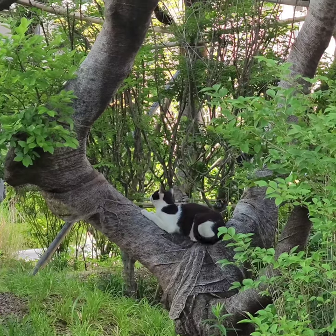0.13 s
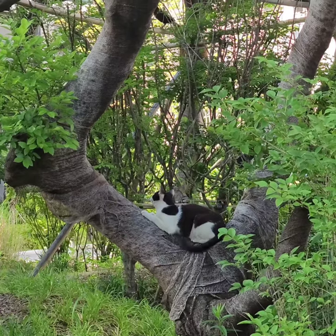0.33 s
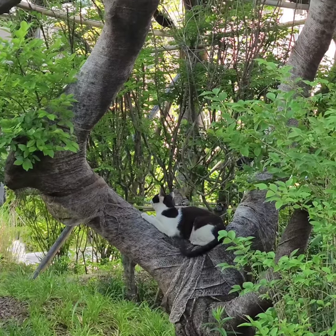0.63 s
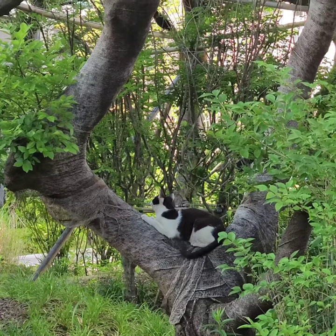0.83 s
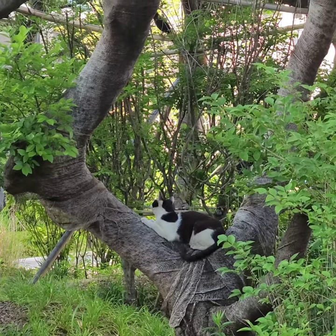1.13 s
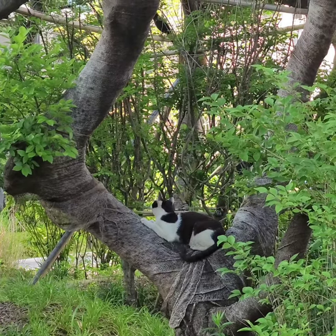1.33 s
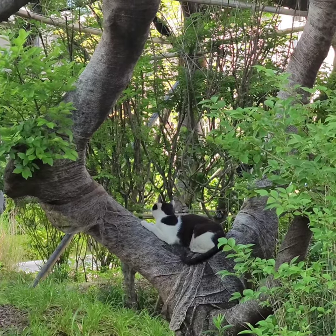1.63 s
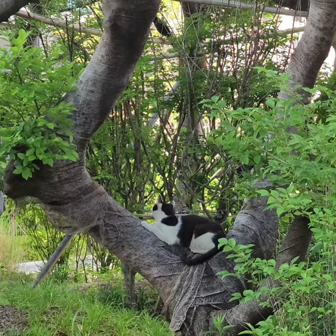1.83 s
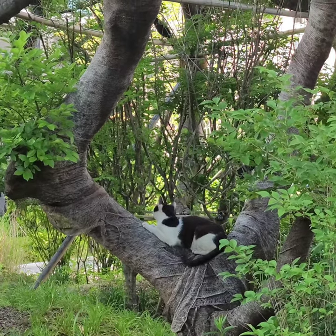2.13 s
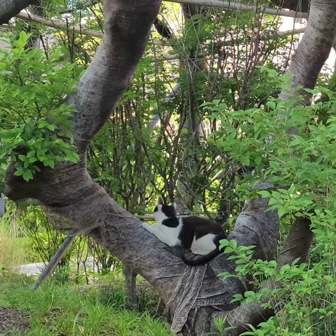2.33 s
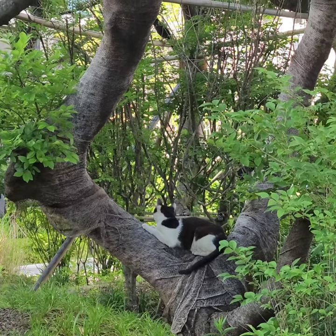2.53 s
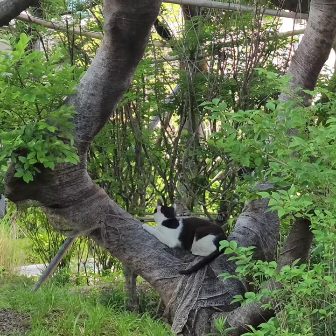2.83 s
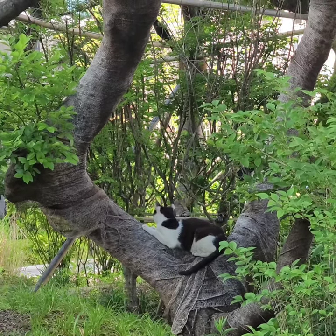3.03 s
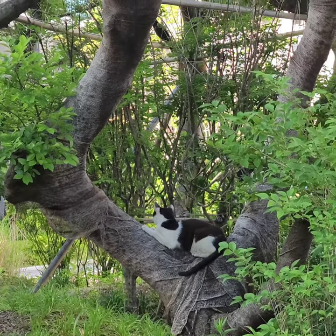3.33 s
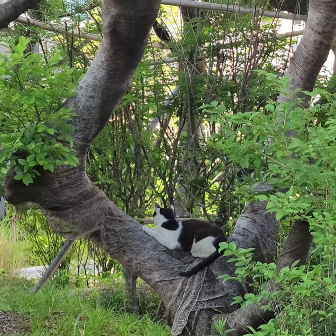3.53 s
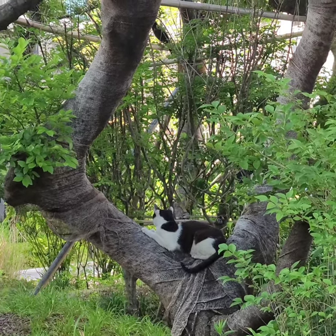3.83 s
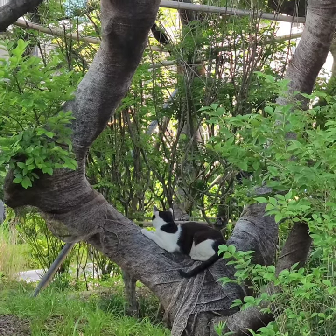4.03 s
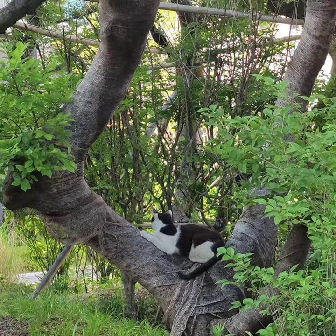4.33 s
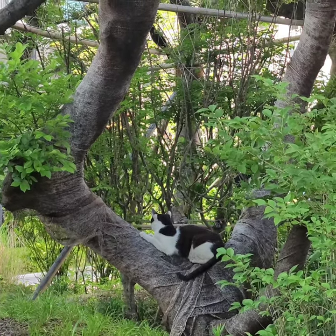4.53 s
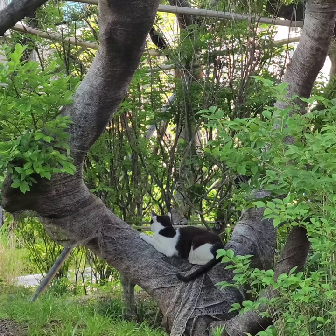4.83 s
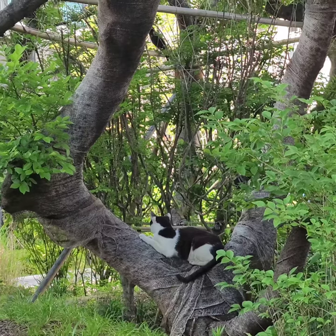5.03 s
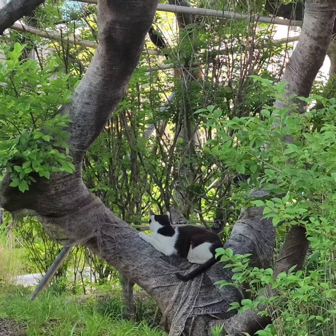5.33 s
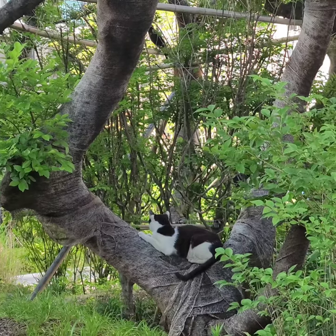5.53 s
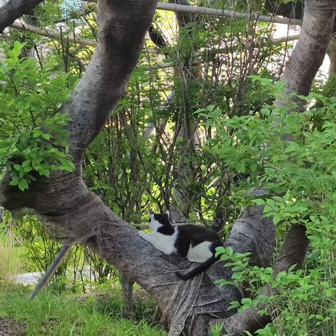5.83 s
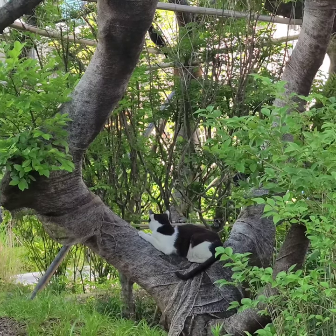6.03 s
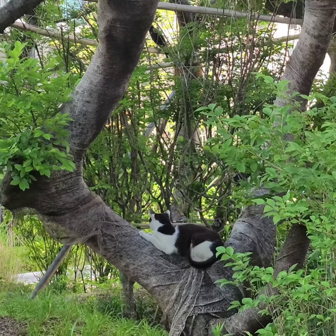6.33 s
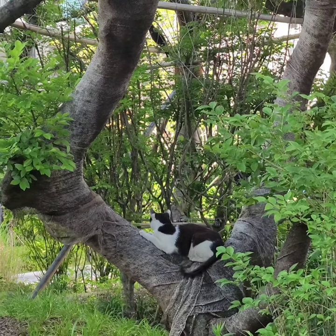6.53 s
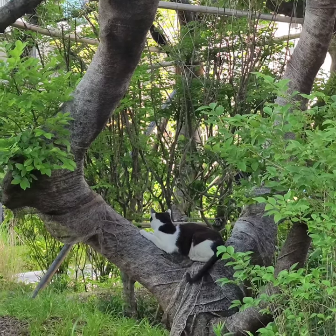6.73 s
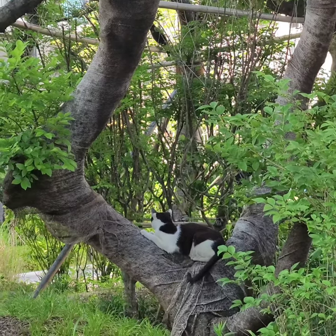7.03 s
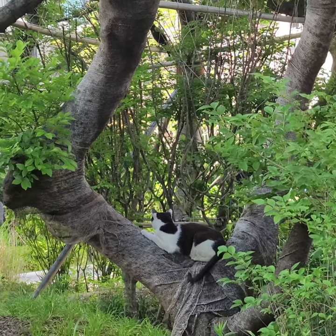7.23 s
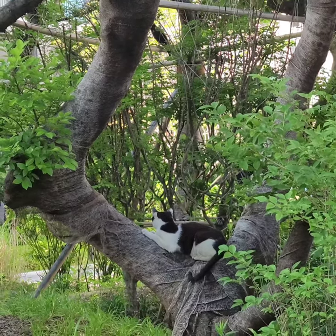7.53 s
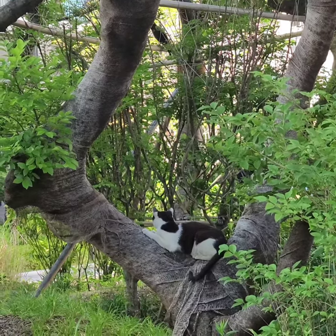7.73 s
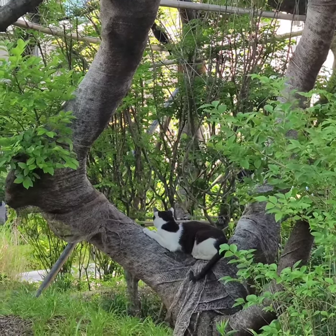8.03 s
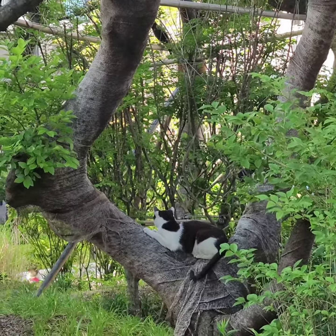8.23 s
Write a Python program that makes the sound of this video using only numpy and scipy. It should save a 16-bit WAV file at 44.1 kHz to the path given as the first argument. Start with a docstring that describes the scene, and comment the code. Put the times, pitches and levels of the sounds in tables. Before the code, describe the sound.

Outdoors among trees, a soft airy hush is joined by handling thuds at the left and thin bird squeaks. A crow gives two short, rough caws about half a second apart, answered by a cluster of husky chirps and pips. Things calm to faint whistles and lightly stirring leaves, then squeaks return near the end. After the caws the stereo hush becomes mono and thin, regaining bass only at the close.

```python
"""A distant hush fills a leafy garden; three soft bumps come on the left and a crow gives two rasping caws.
High arched squeaks, husky chirps, faint whistles and pips sound in the trees, and leaves stir.
The crow is a pulse source ringing in throat resonances; the small birds are tones swept and shaken in pitch.
Hush, rumble and leaves are coloured noise, the bumps are damped sines, and scatter follows each bird call.
For about five seconds the sound turns mono and loses its bass."""
import sys
import numpy as np
from scipy import signal
from scipy.fft import rfft, irfft
from scipy.io import wavfile
from scipy.ndimage import uniform_filter1d

SR = 44100
rng = np.random.default_rng(int(sys.argv[2]) if len(sys.argv) > 2 else 0)


def transcribe(signal):
    """Save signal, clipped to [-1, 1], as a 16-bit WAV file at the path in sys.argv[1]."""
    frames = np.atleast_2d(signal).T
    limited = np.clip(frames, -1, 1)
    pcm = np.round(limited * 32767).astype(np.int16)
    wavfile.write(sys.argv[1], SR, pcm)


N = 369558  # samples
T = np.arange(N) / SR  # seconds


def from_db(db):
    """Decibels are logarithmic: 20 dB is a factor of ten in amplitude."""
    return 10 ** (np.asarray(db) / 20)


def rms_one(x):
    """Normalisation to unit root-mean-square amplitude."""
    return x / np.sqrt(np.mean(x ** 2) + 1e-20)


def ramp(t, length_s):
    """Linear onset: climbs from 0 to 1 over the given length, starting at t = 0."""
    return np.clip(t / length_s, 0, 1)


def bell(t, width_s):
    """Gaussian swell of height 1 around t = 0."""
    return np.exp(-(t / width_s) ** 2)


def phase_of(hz):
    """Phase is the running integral of frequency."""
    return 2 * np.pi * np.cumsum(hz) / SR


def at_hz(points, hz):
    """Spectral interpolation on a log-frequency axis."""
    f, value = np.transpose(points)
    return np.interp(np.log(hz + 1e-3), np.log(f), value)


def butter(x, hz, kind, order=2):
    """Butterworth filtering: a maximally flat passband."""
    return signal.sosfilt(signal.butter(order, hz, kind, fs=SR, output="sos"), x)


def wobble(rate_hz, size):
    """Low-passed noise: a smooth random modulation of unit RMS."""
    noise = rng.standard_normal(size + SR // 4)
    return rms_one(butter(noise, rate_hz, "low")[-size:])  # the filter has settled by then


def resonate(x, hz, width_hz):
    """Resonance by frequency shifting and one-pole smoothing: peak gain 1, the centre may move."""
    r = np.exp(-np.pi * width_hz / SR)
    turn = np.exp(1j * phase_of(hz * np.ones(len(x))))
    return 2 * np.real(turn * signal.lfilter([1 - r], [1, -r], x / turn))


def add(out, start_s, sound):
    """Superposition: mixes a sound in at its time."""
    at = int(start_s * SR)
    out[at:at + len(sound)] += sound[:N - at]


# The crow's caws. Each row: start in seconds, time of highest pitch in s, time of greatest loudness in s,
# end in s, attack in s, release in s, top pitch in Hz, level of the throat sound in dB,
# rasp rate at top pitch in Hz, rasp depth 0-1, pitch drop in each rasp as a share, roughness 0-1,
# upper rasp in dB re throat sound, low harmonics at mid-caw in dB re throat sound,
# low, middle and high throat resonances at full effort in Hz.
CAWS = [(2.101, 2.165, 2.172, 2.347, .002, .022, 318, -22.8, 52, .3, .1, .54, -20, -16.5, 1340, 1610, 1820),
        (2.642, 2.70, 2.73, 2.878, .04, .003, 352, -20.2, 56, .45, .16, .44, -16, -15.5, 1200, 1425, 1680)]
# Throat resonances, low to high. Each row: width in Hz, gain in the first caw in dB, in the second caw in dB.
THROAT = [(260, 2, -3.5), (260, 2.5, 0), (240, 1.5, -7)]
THROAT_BAND_HZ = (1060, 1960)  # the band in which the throat radiates
# A caw's pitch lifts a little and then sags; its level swells and fades.
CAW_RISE_HZ_PER_S, CAW_SAG_HZ_PER_S, CAW_SWELL_DB_PER_S, CAW_FADE_DB_PER_S = 250, 510, 40, 45
# The beak opens with effort and lifts the throat resonances.
THROAT_LIFT_PER_DB = .004  # share of their pitch
# A soft croak leads into each caw: its length, and its level re full voice.
CROAK_S, CROAK_DB = .05, -7


def crow(jitter=0.057, noise_share=.45, upper_hz=3200, low_waver=0.96, low_tilt=0.35,
         low_growth_db_per_s=12, air_db=-40):
    """Source-filter principle: uneven syrinx pulses, chopped and swayed by a rasp, ring in the throat."""
    out = np.zeros(N)
    for k, row in enumerate(CAWS):
        start, highest, loudest, end, attack, release, top_hz, top_db = row[:8]
        rasp_hz, depth, drop, rough, upper_db, low_db, *throat_hz = row[8:]
        t = np.arange(start - CROAK_S, end, 1 / SR)
        pitch = top_hz - np.maximum(CAW_RISE_HZ_PER_S * (highest - t), CAW_SAG_HZ_PER_S * (t - highest))
        croak_db = CROAK_DB * (1 - ramp(t - start, attack))
        effort_db = croak_db - np.maximum(CAW_SWELL_DB_PER_S * (loudest - t),
                                          CAW_FADE_DB_PER_S * (t - loudest))
        envelope = from_db(top_db + effort_db) * ramp(t - t[0], 2 * attack) * ramp(end - t, release)

        # The rasp rate follows the pitch, and the pitch drops within each rasp burst.
        rasp = phase_of(rasp_hz * pitch / top_hz * (1 + .055 * rough * wobble(30, len(t))))
        rasp = rasp - np.interp(highest, t, rasp)
        burst_place = (rasp / (2 * np.pi) + .25) % 1
        sway = phase_of(pitch * drop * (.5 - burst_place))
        phase = phase_of(pitch)
        shaken = phase + 2 * np.pi * jitter * rough * wobble(150, len(t)) + sway

        # One pulse per cycle, with hiss that opens and closes along with it.
        pulses = rms_one(np.maximum(np.diff(np.floor(shaken / (2 * np.pi)), prepend=0), 0))
        hiss = rng.standard_normal(len(t)) * (1 + np.cos(shaken)) / 2
        source = pulses - pulses.mean() + noise_share * rough * rms_one(hiss)

        voice = np.zeros(len(t))
        lift = 1 + THROAT_LIFT_PER_DB * effort_db
        for n, (width, *gains) in enumerate(THROAT):
            # Neighbouring resonances have opposite signs.
            voice += (-1) ** n * from_db(gains[k]) * resonate(source, throat_hz[n] * lift, width)
        voice = rms_one(butter(voice, THROAT_BAND_HZ, "band", order=6))
        # The bird holds its effort steady while the cycles vary.
        voice = voice / np.sqrt(uniform_filter1d(voice ** 2, size=600) + 1e-3)
        upper = rms_one(resonate(resonate(source, upper_hz, 2400), upper_hz, 2400))

        # The first three harmonics waver slightly less and gain weight through the caw.
        low_phase = phase + low_waver * (shaken - phase)
        low = rms_one(sum(n ** low_tilt * np.sin(n * low_phase) for n in range(1, 4)))
        low_gain = from_db(low_db + low_growth_db_per_s * (t - t.mean()))
        caw = voice + from_db(upper_db) * upper + low_gain * low + from_db(air_db) * source
        add(out, t[0], envelope * rms_one(1 + depth * np.cos(rasp)) * caw)
    return out


# High stepped squeaks. Each row: start in seconds, accent in s, high note in s, low note in s, fall in s,
# end in s, top pitch before the sag in Hz, low note in Hz, middle of the fall in Hz,
# accent in dB, high note in dB, low note in dB, fall in dB, swell of the high note in dB,
# warble of the high note as a share of pitch.
SQUEAKS = [(1.157, 1.170, 1.184, 1.224, 1.261, 1.272, 8450, 6600, 5200, -18, -16.5, -25, -29, -8, .015),
           (1.324, 1.339, 1.345, 1.405, 1.421, 1.432, 8450, 6350, 5200, -22.5, -29.5, -21.5, -30, 0, .05),
           (2.569, 2.580, 2.586, 2.621, 2.633, 2.648, 7600, 6400, 5700, -34, -23.5, -22, -29, 0, .024),
           (2.708, 2.730, 2.735, 2.768, 2.782, 2.797, 8020, 6100, 4750, -20.5, -27.5, -36, -35, -5, .014),
           (7.207, 7.224, 7.232, 7.277, 7.296, 7.318, 8620, 6700, 5450, -16.5, -23, -26.5, -28.5, -1, .04),
           (7.401, 7.414, 7.420, 7.468, 7.483, 7.510, 8500, 6450, 5800, -29, -29.5, -29, -26, 0, .056)]
# The high note swoops up from below and sags; a faint tone and an accent sound on the way up.
SWOOP_FROM_HZ, SWOOP_S, SQUEAK_SAG_HZ_PER_S = 5000, 0.0087, 5000
SWOOP_DB, ACCENT_WIDTH_S = -37.5, 0.0036
# The voice breaks to the low note, which falls away at the end.
BREAK_S, FALL_HZ_PER_S = 0.00397, 32000


def squeaks(warble_hz=290, unevenness=.35, flutter_db=3.0, attack_s=.005, warble_grow_s=0.028,
            low_warble=0.037, fall_warble=0.073):
    """Frequency modulation: a tone swoops to a high note, breaks to a low one and falls, warbling unevenly."""
    out = np.zeros(N)
    for row in SQUEAKS:
        start, accent_s, high_s, break_s, fall_s, end, top_hz, low_hz, fall_hz = row[:9]
        accent_db, high_db, low_db, fall_db, swell_db, warble = row[9:]
        t = np.arange(start, end, 1 / SR)
        # Three overlapping shares: high note, low note and fall.
        high = ramp(break_s - t, BREAK_S)
        fall = ramp(t - fall_s + BREAK_S, BREAK_S)
        low = (1 - high) * (1 - fall)

        swoop_hz = (top_hz - SWOOP_FROM_HZ) * np.exp((start - t) / SWOOP_S)
        high_hz = top_hz - swoop_hz - SQUEAK_SAG_HZ_PER_S * (t - start)
        falling_hz = fall_hz - FALL_HZ_PER_S * (t - (fall_s + end) / 2)
        pitch = high * high_hz + low * low_hz + fall * falling_hz

        held = from_db(high_db + swell_db * ramp(t - high_s, break_s - high_s)) * ramp(t - high_s, attack_s)
        high_gain = from_db(SWOOP_DB) + held + from_db(accent_db) * bell(t - accent_s, ACCENT_WIDTH_S)
        gain = high * high_gain + low * from_db(low_db) + fall * from_db(fall_db)

        spread = high * warble * ramp(t - start, warble_grow_s) + low * low_warble + fall * fall_warble
        shake = np.sqrt(2) * np.sin(phase_of(warble_hz * (1 + unevenness * wobble(199, len(t)))))
        tone = np.sin(phase_of(pitch * (1 + spread * shake)))
        flutter = from_db(flutter_db * wobble(180, len(t)))
        add(out, start, tone * gain * flutter * signal.windows.tukey(len(t), .06))
    return out


# Husky chirps. Each row: start in seconds, length in s, top pitch in Hz, level in dB before chirp_db is added,
# swell over its length in dB, tremor as a share of pitch, regularity of the tremor 0-1,
# upper tone in Hz, upper tone in dB re lower tone.
CHIRPS = [(1.522, 0.11, 4130, -36, 0, 0.088, 0.7, 5670, -12),
          (1.699, 0.066, 4270, -35.5, 4, .07, 0.65, 6200, -20),
          (2.868, 0.065, 3980, -37, 2.5, .07, .7, 7600, -12),
          (2.938, .05, 4500, -34.5, 5, 0.14, 0.7, 5500, -9),
          (3.059, 0.071, 4070, -35.5, 2.5, 0.062, .65, 5670, -19.5),
          (3.115, 0.058, 4140, -31.5, 1, 0.072, 0.75, 5800, -15),
          (3.161, .06, 4450, -31, -1, 0.059, .7, 5800, -17),
          (3.287, 0.05, 4220, -30.5, 3, 0.057, 0.82, 7500, -12),
          (3.314, .085, 4655, -27.5, 0, 0.073, 0.88, 8070, -8),
          (3.373, 0.059, 4920, -27, 8, .03, 0.9, 7060, -11.5),
          (3.556, .055, 4410, -33, 4, 0.074, 0.8, 7000, -19),
          (3.604, .075, 4630, -29, -9, .066, 0.89, 7000, -22),
          (7.581, .05, 3900, -39, 2.5, .04, .6, 8240, -4),
          (7.629, .065, 4220, -37, 2.5, .11, 0.7, 8240, -6)]
# A chirp slides up to its top pitch: start as a share of the top, slide time, share of its length spent fading.
CHIRP_FROM, CHIRP_SLIDE_S, CHIRP_TAPER = .95, 0.0183, 0.24


def chirps(tremor_hz=305, unevenness=0.2, upper_tremor=.009, hiss_hz=6500, hiss_width_hz=1700, hiss_db=-3,
           throb_hz=45):
    """Two-voice syrinx: fast FM makes one tone husky; the other side adds a steadier one and throbbing hiss."""
    out = np.zeros(N)
    for start, length, top_hz, level_db, swell_db, tremor, steady_share, upper_hz, upper_db in CHIRPS:
        size = int(length * SR)
        ratio = CHIRP_FROM + (1 - CHIRP_FROM) * ramp(np.arange(size) / SR, CHIRP_SLIDE_S)
        shape_db = swell_db * np.linspace(-.5, .5, size)
        beat_hz = tremor_hz * (1 + unevenness * (1 - steady_share) * wobble(56, size))
        beat = np.sqrt(2) * np.sin(phase_of(beat_hz))
        shake = steady_share * beat + (1 - steady_share) * wobble(tremor_hz, size)
        lower = np.sin(phase_of(top_hz * ratio * (1 + tremor * shake)))

        upper = np.sin(phase_of(upper_hz * ratio * (1 + upper_tremor * wobble(tremor_hz, size))))
        hiss = resonate(rng.standard_normal(size), hiss_hz, hiss_width_hz)
        hiss = rms_one(resonate(hiss, hiss_hz, hiss_width_hz))
        throb = (1 + np.cos(phase_of(throb_hz * ratio))) / 2
        upper = upper + from_db(hiss_db) * hiss * throb
        envelope = from_db(level_db + shape_db) * signal.windows.tukey(size, CHIRP_TAPER)
        add(out, start, (lower + from_db(upper_db) * upper) * envelope)
    return out


# Thin whistles. Each row: start in seconds, length in s, note name, level in dB before far_db is added.
WHISTLES = [(.82, 0.15, "low", -42), (1.26, 0.096, "middle", -36.5), (1.343, 0.083, "middle", -45),
            (1.44, .13, "low", -44.5), (1.77, 0.051, "middle", -36.5), (1.94, .1, "low", -45),
            (1.98, .08, "high", -46), (3.95, 0.11, "low", -44), (4.15, .1, "low", -42),
            (4.66, 0.06, "middle", -39), (4.82, 0.12, "low", -43), (5.31, .08, "middle", -46.5),
            (5.86, .08, "low", -44), (6.36, 0.23, "high", -42)]
# Pitch of each named note in Hz.
WHISTLE_HZ = {"low": 2520, "middle": 3310, "high": 8200}
# Waver of each named note as a share of its pitch.
WHISTLE_WAVER = {"low": 0.0076, "middle": 0.0018, "high": 0.0206}
# Short rising pips. Each row: middle in seconds, level in dB before far_db is added.
PIPS = [(2.52, -42), (2.85, -33), (3.047, -33), (3.213, -37), (3.418, -31.5), (3.896, -32.5), (4.24, -36),
        (7.175, -31), (7.297, -31), (7.462, -33.5), (7.641, -30), (7.791, -33), (7.995, -33.5)]
PIP_HZ, PIP_SCATTER = 2114, 0.0196  # mean pitch, and its spread between pips as a share


def far_birds(pip_s=.022, pip_rise=0.21, pip_rough=0.044):
    """Sinusoidal tones: level whistles waver slowly in pitch; very short pips glide roughly upward."""
    out = np.zeros(N)
    for start, length, note, level_db in WHISTLES:
        size = int(length * SR)
        hz = WHISTLE_HZ[note] * (1 + WHISTLE_WAVER[note] * wobble(61, size))
        envelope = from_db(level_db) * signal.windows.tukey(size, .5)
        add(out, start, envelope * np.sin(phase_of(hz)))
    glide = np.linspace(-.5, .5, int(pip_s * SR))
    for s, level_db in PIPS:
        hz = PIP_HZ * (1 + PIP_SCATTER * rng.standard_normal() + pip_rough * wobble(400, len(glide)))
        tone = np.sin(phase_of(hz * (1 + pip_rise * glide)))
        add(out, s - pip_s / 2, from_db(level_db) * np.hanning(len(glide)) * tone)
    return out


# Bumps on the microphone. Each row: start in seconds, pitch in Hz,
# height in dB before rise, decay and channel gain, 60 dB decay time in s.
BUMPS = [(0.608, 128, -5.5, 0.0403), (.618, 48, -13.5, 0.11), (0.707, 108, -10, 0.061),
         (0.721, 50.2, -16.5, 0.14), (0.904, 86.5, -8, 0.047)]


def bumps(rise_s=0.004, left_db=3, right_db=-22):
    """Damped oscillation: soft thuds die away exponentially, almost only on the left."""
    out = np.zeros(N)
    t = np.arange(SR // 4) / SR
    for s, hz, height_db, t60 in BUMPS:
        envelope = from_db(height_db - 60 * t / t60) * (1 - np.exp(-t / rise_s))
        add(out, s, envelope * np.sin(2 * np.pi * hz * t))
    return out * from_db([[left_db], [right_db]])


def wall_echo(x, delay_s=.0222, echo_db=-9):
    """Specular reflection: a nearby wall returns one delayed, weaker copy."""
    return x + from_db(echo_db) * np.interp(T - delay_s, T, x, left=0)


def garden(x, wet_db, t60, width, first_s):
    """Diffuse scattering: trunks, leaves and walls return dense echoes that decay exponentially."""
    t = np.arange(int(.7 * SR)) / SR
    mid, side = rng.standard_normal((2, len(t))) * from_db(-60 * t / t60) * (t > first_s)
    scatter = (mid + width * side * [[1], [-1]]) / np.sqrt(np.sum(mid ** 2))
    return x + from_db(wet_db) * signal.fftconvolve(x[None], scatter, axes=1)[:, :N]


# Single brief rustles. Each row: middle in seconds, length in s, centre in Hz,
# width of each resonance in Hz, level in dB before the fade in and out.
RUSTLES = [(7.023, 0.033, 2000, 1800, -33), (7.199, .06, 2000, 1200, -37), (7.302, 0.033, 1450, 700, -38)]


def rustles():
    """Frictional noise: a few leaves brush together more strongly, as noise through two resonances."""
    out = np.zeros(N)
    for s, length, hz, width_hz, level_db in RUSTLES:
        size = int(length * SR)
        brush = resonate(rng.standard_normal(size), hz, width_hz)
        brush = rms_one(resonate(brush, hz, width_hz))
        add(out, s - length / 2, from_db(level_db) * np.hanning(size) * brush)
    return out


# Light gusts that swell the hush and stir the nearer leaves.
# Each row: peak in seconds, half-width in s, swell of the hush in dB, level of the leaves in dB before flutter.
GUSTS = [(.25, 0.44, 1, -46), (1.1, 0.19, 1.5, -55), (6.5, 0.517, 3, -58), (7.08, .22, 1.5, -48)]


def leaf_ticks(calm_per_s=14, gust_per_s=55, tick_db=-43.5, spread_db=5, low_hz=1100, high_hz=2300,
               width_hz=450):
    """Random point process: leaves brush in short, soft ticks, more often in a gust."""
    out = np.zeros(N)
    size = SR // 60
    rate = calm_per_s + gust_per_s * sum(bell(T - s, width) for s, width, *_ in GUSTS)
    for s in T[rng.random(N) < rate / SR]:
        brush = rms_one(resonate(rng.standard_normal(size), rng.uniform(low_hz, high_hz), width_hz))
        level_db = tick_db + spread_db * rng.uniform(-1.2, 1)
        add(out, s, from_db(level_db) * np.hanning(size) * brush)
    return out


# Left-right likeness of the noise. Each row: frequency in Hz, likeness 0-1.
LIKENESS = [(25, 0.44), (120, 0.93), (250, 0.84), (600, 0.66), (1700, 0.92), (2300, 1), (4000, 1),
            (8000, 1)]


def stereo_noise(spectrum):
    """Interchannel coherence: coloured noise, widest in the deep bass and mono in the treble."""
    hz = np.fft.rfftfreq(N, 1 / SR)
    alike = np.clip(at_hz(LIKENESS, hz), 0, 1)
    mid, side = rfft(rng.standard_normal((2, N))) * from_db(at_hz(spectrum, hz))
    return rms_one(irfft(np.sqrt(1 + alike) * mid + np.sqrt(1 - alike) * side * [[1], [-1]], N))


# Colour of the stirring leaves. Each row: frequency in Hz, relative density in dB per Hz.
STIR_COLOUR = [(500, -40), (1100, 1), (1500, 1), (2400, -4), (4000, -26), (9000, -49)]


def leaves(flutter_db=2, calm_db=-60):
    """Amplitude-modulated noise: light stirs of air rustle the nearer leaves."""
    stir = from_db(calm_db) + sum(from_db(level_db) * bell(T - s, width) for s, width, _, level_db in GUSTS)
    return stir * from_db(flutter_db * wobble(11, N)) * stereo_noise(STIR_COLOUR)


# Colour of the far hush. Each row: frequency in Hz, relative density in dB per Hz.
HUSH = [(180, -28), (300, -10), (509, -6.5), (631, -3.5), (781, -4), (1000, 2), (2070, -2), (2480, -1),
        (2740, -4), (3400, -1.5), (7020, -9), (8140, -8), (11700, -25.5), (14500, -41), (15500, -28)]
# Colour of the low rumble. Each row: frequency in Hz, relative density in dB per Hz.
RUMBLE = [(12, -23), (22, -4), (38, 1.5), (56, 3.5), (90, -5), (130, -10), (190, -12.5), (290, -16),
          (420, -19.5), (650, -28), (1500, -67)]


def background(hush_db=-35.5, rumble_db=-40, lumps_db=2.0):
    """Coloured noise: the far hush of leaves and town swells with each gust over a lumpy rumble."""
    swell_db = sum(lift_db * bell(T - s, width) for s, width, lift_db, _ in GUSTS)
    hush = from_db(hush_db + swell_db) * stereo_noise(HUSH)
    rumble = from_db(rumble_db + lumps_db * wobble(7.1, N)) * stereo_noise(RUMBLE)
    return hush + rumble


def scene(crow_db=0.0, squeak_db=0, chirp_db=1.0, far_db=2):
    """Superposition of all sources: the crow's scatter is wide; the small birds sit in the middle."""
    caws = garden(from_db(crow_db) * wall_echo(crow()), wet_db=-9.5, t60=0.069, width=2.0, first_s=0.0026)
    near = garden(from_db(squeak_db) * squeaks(), wet_db=-1, t60=0.45, width=0, first_s=0.0045)
    husky = garden(from_db(chirp_db) * chirps(), wet_db=-3.0, t60=0.42, width=0, first_s=0.0038)
    far = garden(from_db(far_db) * far_birds(), wet_db=-3.5, t60=0.55, width=0, first_s=0.0066)
    birds = caws + near + husky + far
    return birds + bumps() + rustles() + leaf_ticks() + leaves() + background()


BASS_GAP_S = (2.886, 8.075)  # start and end of the mono, bass-poor stretch
CUTOFF_HZ = 15800


def record(dry, low_cut_hz=325, leak_db=-48):
    """Linear filtering: one stretch is mono and nearly without bass; the top is always cut."""
    mono = dry.mean(axis=0)
    thin = butter(butter(mono, low_cut_hz, "high"), low_cut_hz, "high", order=3)
    thin = thin + from_db(leak_db) * mono
    inside = (T > BASS_GAP_S[0]) & (T < BASS_GAP_S[1])
    share = uniform_filter1d(1.0 * inside, size=400)  # a short crossfade at either end
    top_cut = signal.ellip(12, .1, 90, CUTOFF_HZ, fs=SR, output="sos")
    return signal.sosfilt(top_cut, dry + share * (thin - dry))


dry = scene()
out = record(dry)
transcribe(out)
```